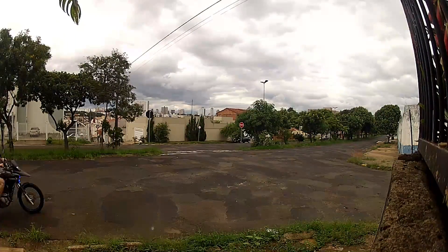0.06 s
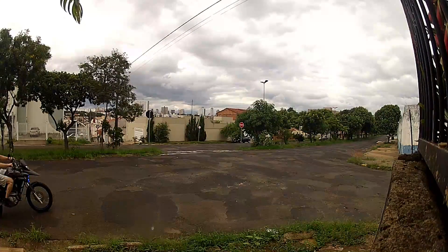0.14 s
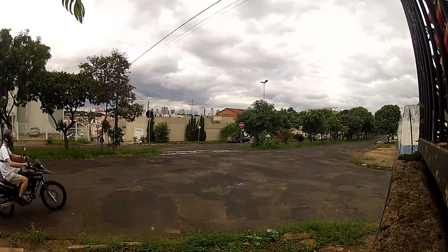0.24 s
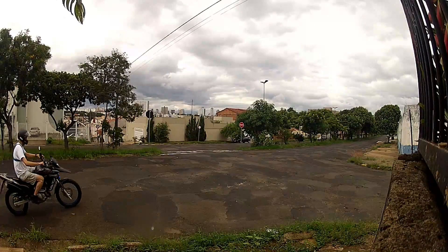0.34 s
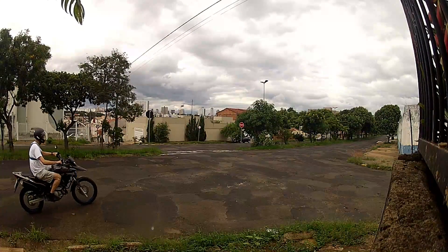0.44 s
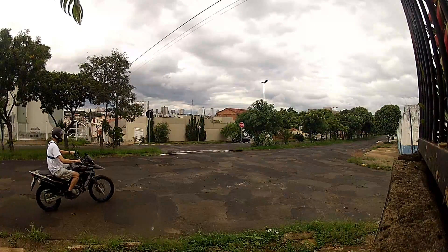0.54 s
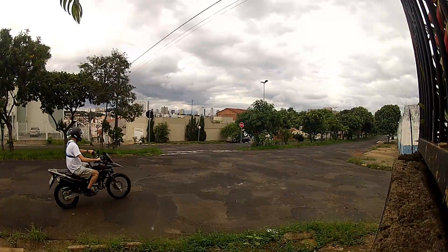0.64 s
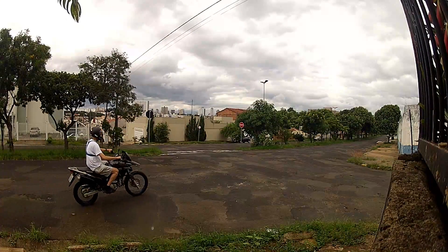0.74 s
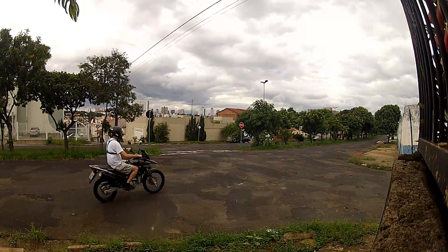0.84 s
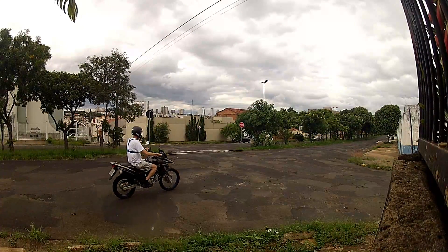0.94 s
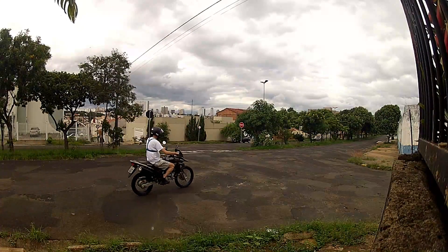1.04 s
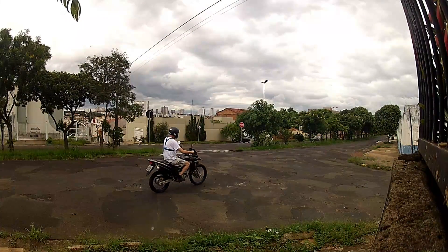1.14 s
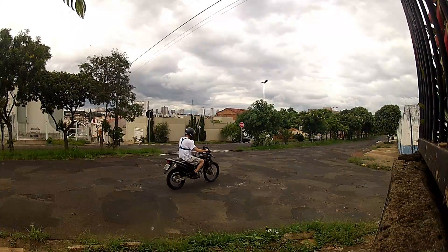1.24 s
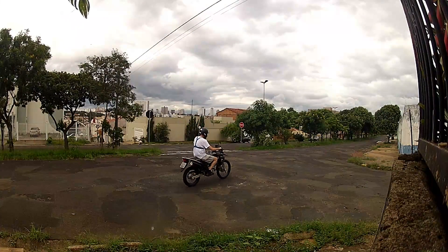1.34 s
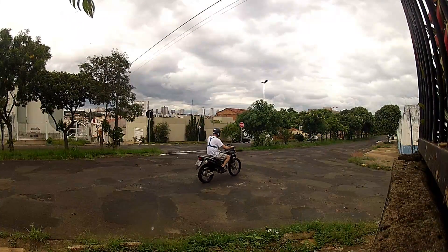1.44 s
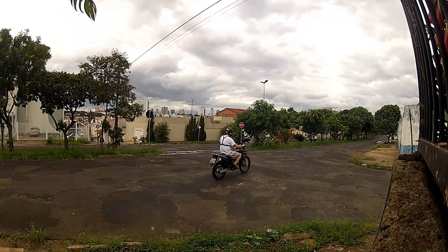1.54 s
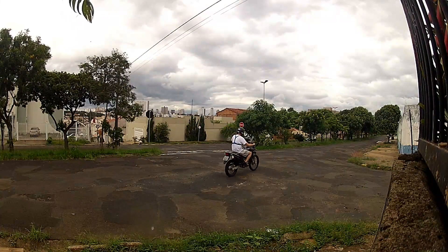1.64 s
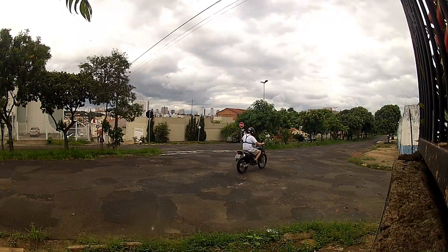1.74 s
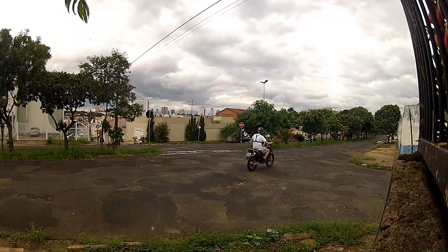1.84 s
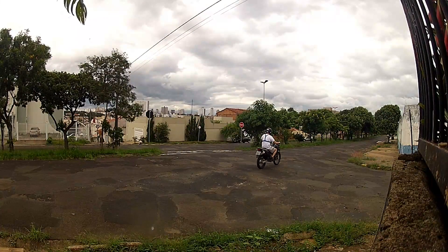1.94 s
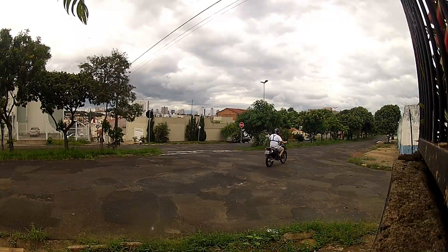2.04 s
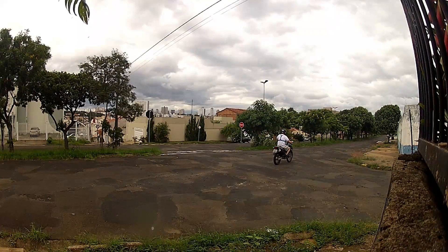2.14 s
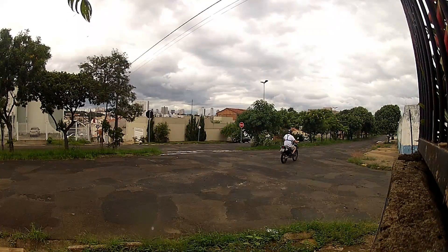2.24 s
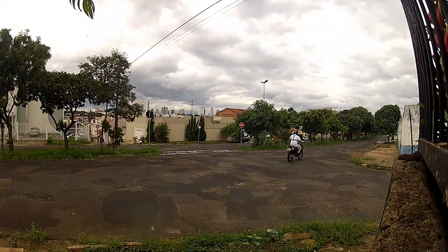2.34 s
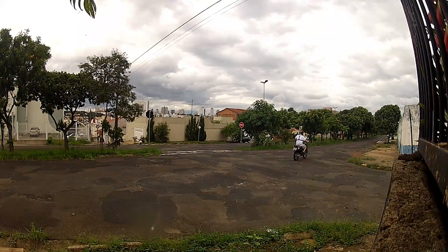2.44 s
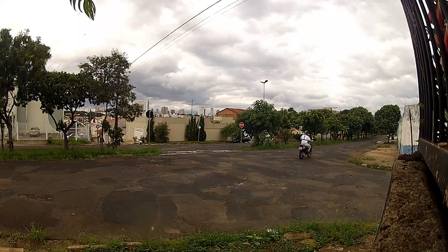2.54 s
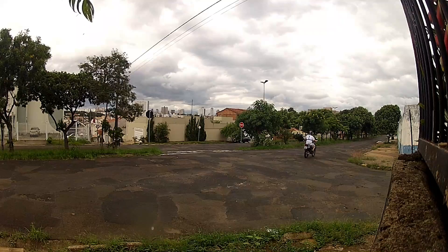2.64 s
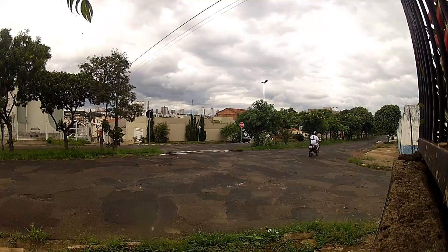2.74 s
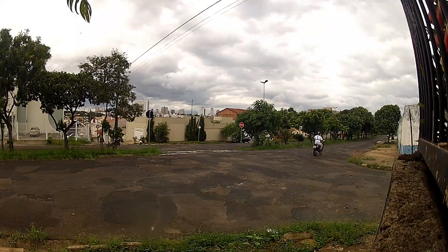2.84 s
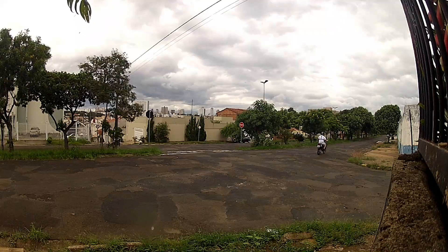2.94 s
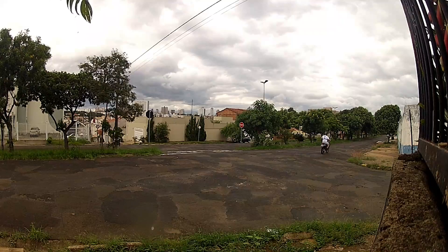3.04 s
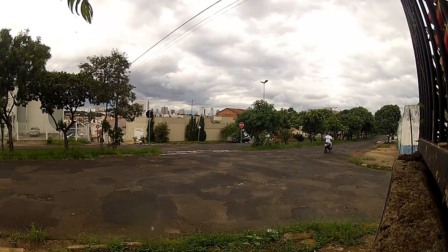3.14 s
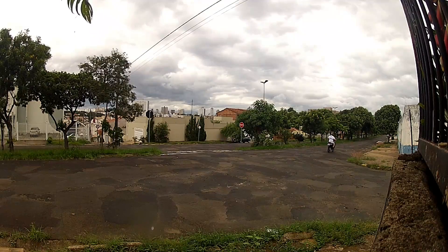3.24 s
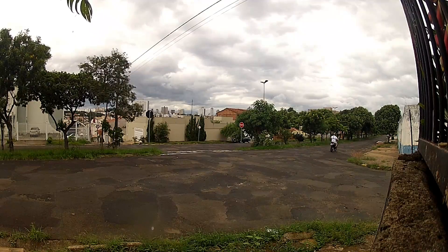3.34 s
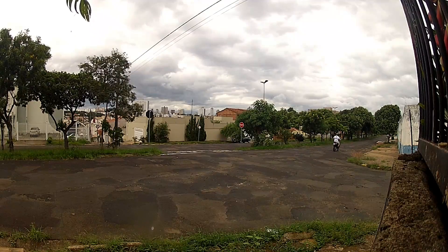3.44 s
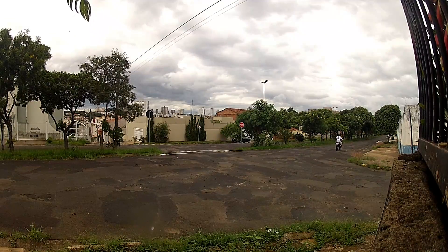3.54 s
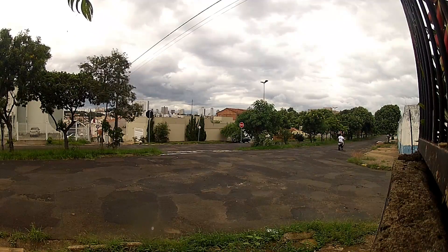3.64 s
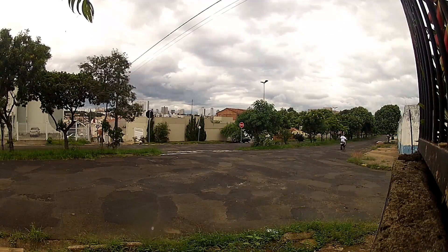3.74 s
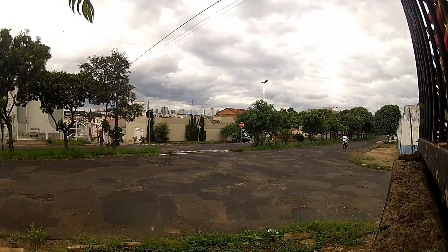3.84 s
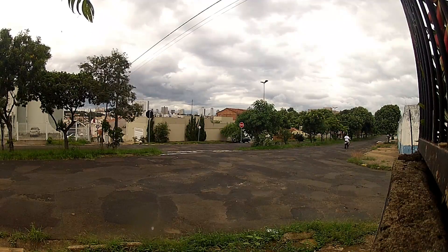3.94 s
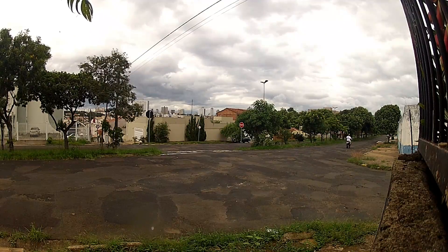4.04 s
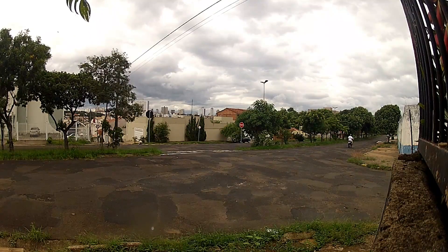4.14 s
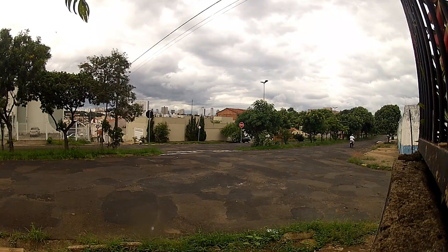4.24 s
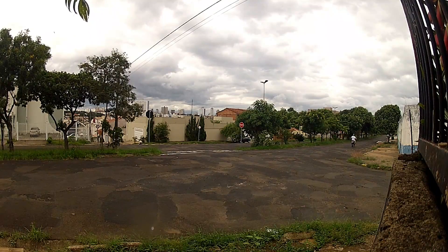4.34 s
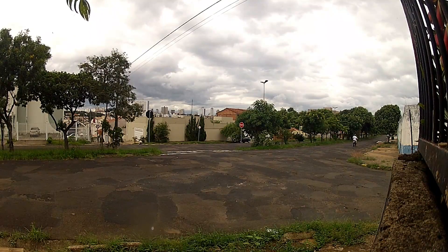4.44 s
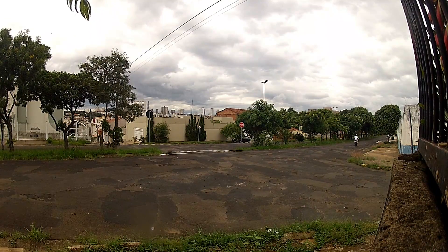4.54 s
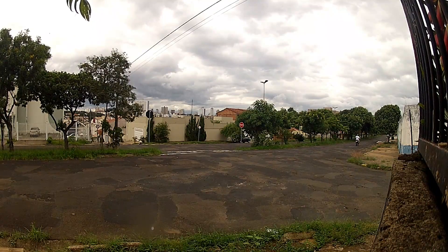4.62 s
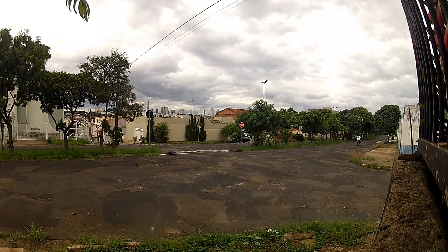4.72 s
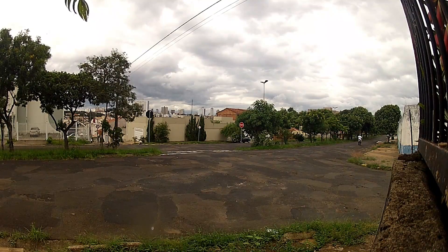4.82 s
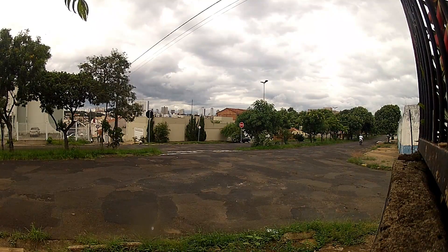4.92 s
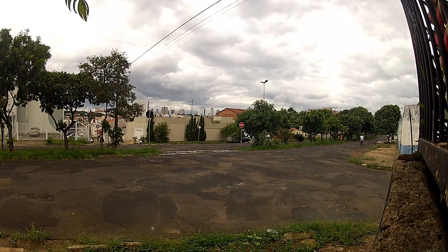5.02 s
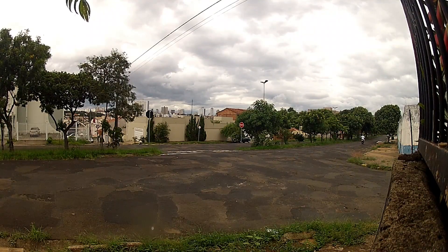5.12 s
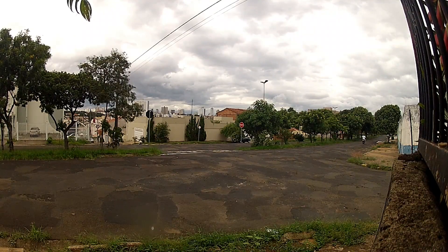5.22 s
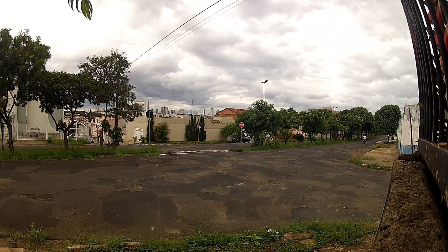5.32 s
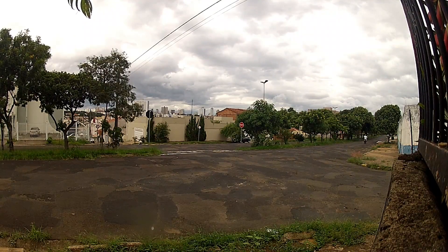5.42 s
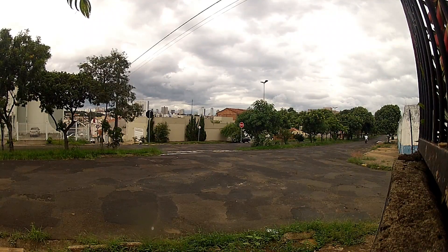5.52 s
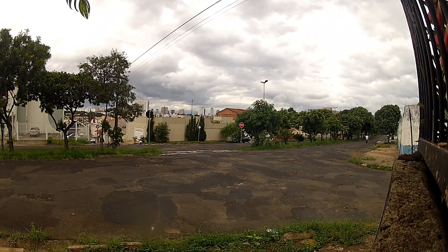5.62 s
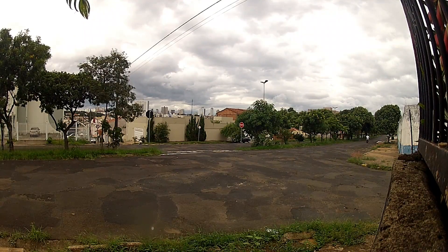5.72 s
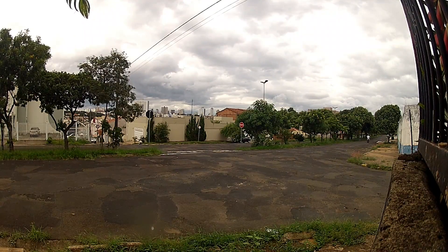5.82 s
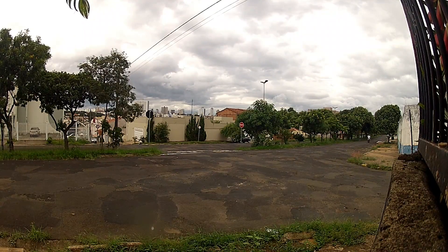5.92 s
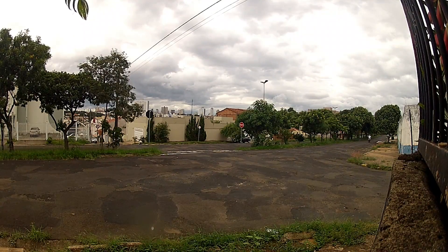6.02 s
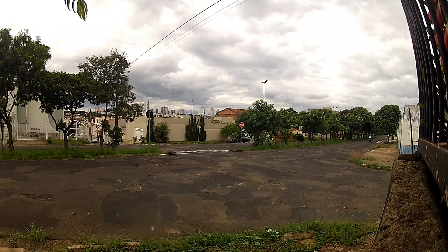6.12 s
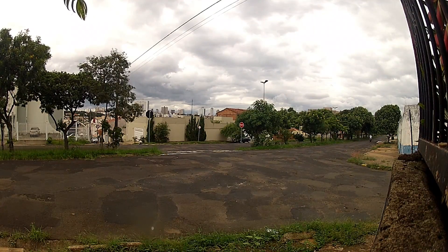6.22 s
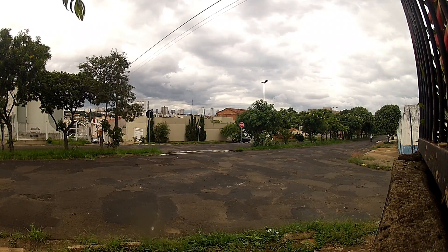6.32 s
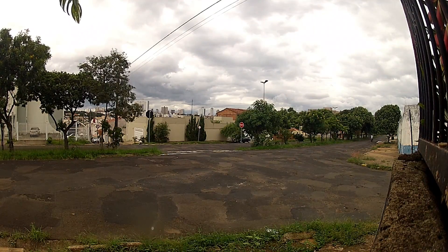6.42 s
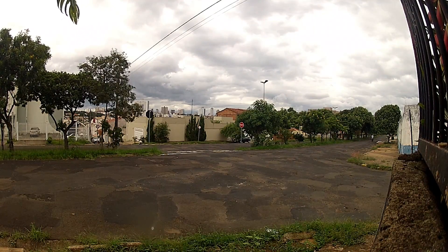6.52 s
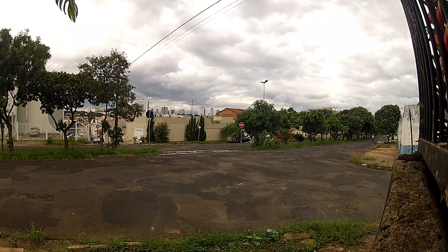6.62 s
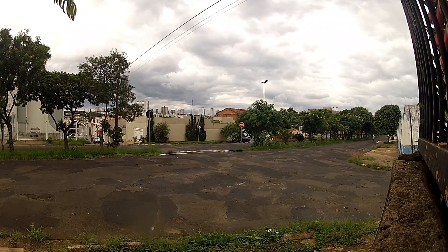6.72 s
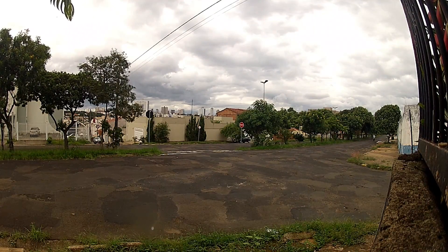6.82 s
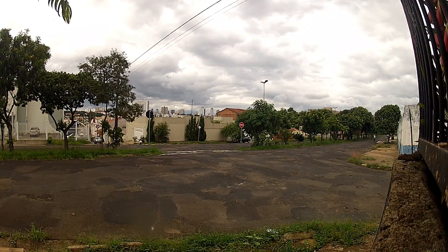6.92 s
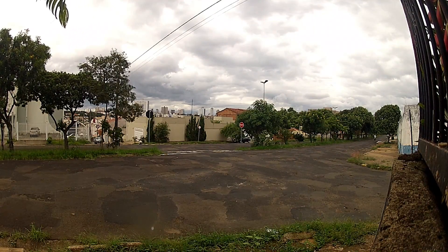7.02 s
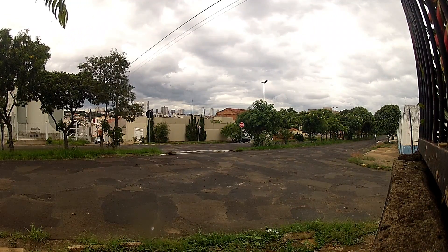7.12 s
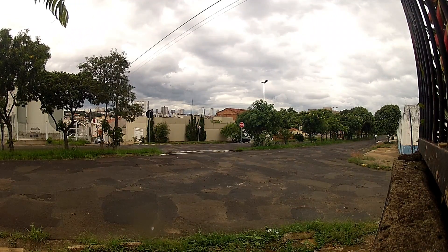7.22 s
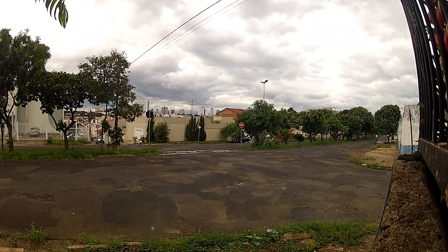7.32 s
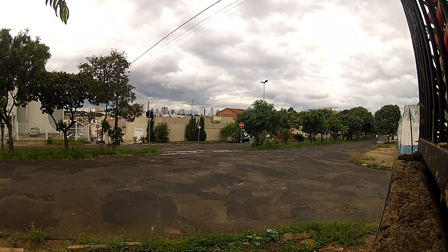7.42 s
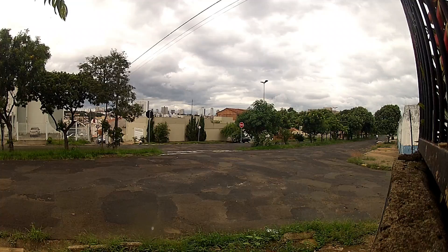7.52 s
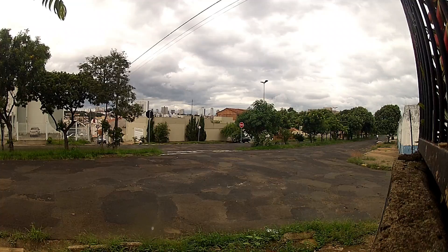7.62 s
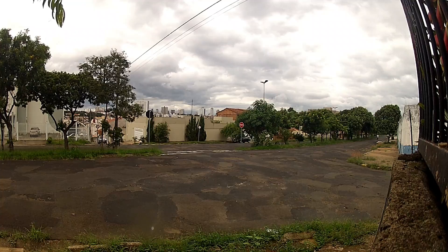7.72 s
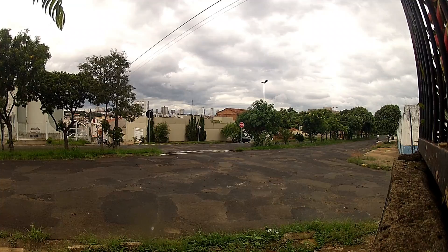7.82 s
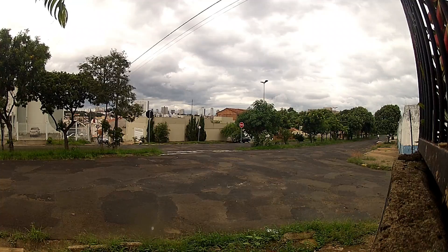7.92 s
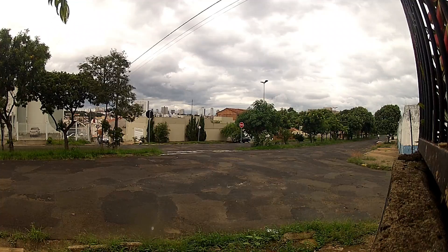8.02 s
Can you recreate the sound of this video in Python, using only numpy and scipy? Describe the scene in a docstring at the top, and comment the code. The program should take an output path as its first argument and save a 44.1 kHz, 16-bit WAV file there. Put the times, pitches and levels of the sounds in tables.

```python
"""Motorcycle passing on a suburban street

A single-cylinder motorcycle passes about 4 m from a camera's microphone and rides off, changing up three times.
Each firing gives a boom in the pipes and a puff of gas; valves and chain rattle in bursts tied to the same cycle.
Sparse echoes off walls and trees take over with distance, with tyre hiss, a click and a squeak over a faint hush.
The camera mirrors the sound around a high tone, which adds a fizzy treble."""
import sys
import numpy as np
from scipy import signal
from scipy.fft import rfft, irfft
from scipy.io import wavfile
from scipy.ndimage import uniform_filter1d

SR = 44100
rng = np.random.default_rng(int(sys.argv[2]) if len(sys.argv) > 2 else 0)


def wav_out(sig):
    """Save sig, one row per channel (or a flat mono array), as 16-bit PCM at SR to the path in sys.argv[1]."""
    wavfile.write(sys.argv[1], SR, np.round(np.clip(np.atleast_2d(sig).T, -1, 1) * 32767).astype(np.int16))


N = 355887
TIME = np.arange(N) / SR
FREQS = np.fft.rfftfreq(N, 1 / SR)

# the ride: nearest the microphone at PASS_S, then away at a growing speed
PASS_S, NEAREST_M, SPEED_M_PER_S, ACCELERATION_M_PER_S2 = 0.65, 4.02, 5.61, 1.78
# side that the bike shows: (time [s], heading [0 alongside, 1 just behind, 2 far behind])
HEADING = [(.9, 0), (1.35, 1), (1.9, 1), (2.7, 1.8), (4, 2)]
# one row per gear: (throttle opens [s], throttle shuts [s], rate at opening [firings/s],
# rate at shutting [firings/s], bulge of the climb [firings/s], bulge of the fall to the next gear [firings/s])
GEARS = [(0, .95, 22.306, 39.134, -.933, .762), (1.32, 3.13, 24.415, 41.68, -1.317, -3.78),
         (3.53, 5.19, 29.252, 37.634, .075, 3.55), (5.86, 8.07, 29.068, 32.026, .918, 0)]
OPEN_S, SHUT_S = .15, .035  # how long the throttle takes to open and to shut
# engine swells and dips down the street: (time [s], level change [dB])
SWELL = [(0, 1), (1.1, -1), (1.6, 1), (2.2, -0.5), (2.95, 1.5), (3.5, -1.5), (4.0, -1), (5.15, 2),
         (5.7, -1), (6.35, 2), (7.1, -1), (8.07, -2.5)]

# boom, the tone at twice the firing rate, under throttle: (time [s], level [dB])
BOOM = [(0, -24.5), (.5, -11.5), (.9, -6.5), (1.35, -16), (1.8, -11), (1.95, -16), (2.39, -12.5),
        (2.51, -8), (2.7, -10), (2.81, -22.5), (3.05, -7.5), (3.55, -23), (3.9, -24), (4.2, -13.5),
        (4.7, -10.5), (5.1, -25.5), (6.05, -28), (8.07, -44)]
# pipe tones, one row per gear, before resonance and distance:
# (3rd [dB], 4th [dB], 5th [dB], 6th [dB], 7th and higher multiples of the firing rate [dB])
GEAR_TONES = [(-26, -20.5, -21.5, -33.5, -34.5), (-19.5, -17.5, -15, -18.5, -24.5),
              (-24.5, -20, -20, -14, -26), (-24, -14, -17, -20.5, -26.5)]
# pipe resonances that the tones slide through under throttle: (frequency [Hz], gain [dB])
PIPE_OPEN = [(66, -17), (80, 2.5), (93, 5.5), (125, 1), (160, 1), (190, -2.5), (220, 3.5), (250, -7),
             (290, -10.5), (390, -1.5), (480, -15)]
# pipe tones with the throttle shut, before swells and distance: (frequency [Hz], level [dB])
PIPE_SHUT = [(60, -24), (75, -15), (90, -8.5), (108, -11), (122, -19.5), (142, -19.5), (160, -26.5),
             (280, -39.5), (450, -53)]

# exhaust colour beside, just behind and far behind the bike: (frequency [Hz], relative level [dB])
RASP_NEAR = [(150, -22), (230, 0), (290, -7), (345, -6), (393, 4.5), (470, -6), (549, 3), (630, -4.5),
             (740, -4), (850, -11.5), (980, -36), (1400, -40), (2200, -23.5)]
RASP_BEHIND = [(160, -11), (238, 8), (285, -4.5), (390, 0), (460, 1.5), (550, -3.5), (660, 0), (780, 1),
               (870, -5), (1000, -16), (1400, -12), (2200, -18.5)]
RASP_FAR = [(150, -16), (250, 0.5), (330, 4.5), (400, 0.5), (460, -0.5), (560, -4), (680, -4.5),
            (780, -3.5), (870, -9.5), (1000, -18.5), (1400, -34), (2200, -29)]
# colour of the valves and chain: (frequency [Hz], relative level [dB])
CLATTER = [(530, -37), (900, -2.5), (974, -1), (1250, -5), (1520, -7.5), (1910, -1), (2260, 5),
           (2650, -0.5), (2910, 0), (3280, -6.5), (3940, -8), (4260, -11.5), (5080, -16.5), (6000, -13),
           (7800, -28), (13200, -120)]
# loudness laws, before swells, roar and echoes: (level nearest at 30 firings/s [dB],
# change with distance [dB/doubling], change with engine speed [dB/doubling], change with throttle shut [dB])
RASP_LAW = (-21, -4, 4, -4.5)
CLATTER_LAW = (-28.5, -6, 6.5, -2)
# intake roar: starts at this rate [firings/s], is full this much higher [firings/s], its boost [dB]
ROAR_FROM, ROAR_SPAN, ROAR_DB = 27, 3, 4

# tyre hiss on damp asphalt: (time [s], level [dB])
TYRES = [(0, -61), (1, -46), (3, -52), (5.1, -55.5), (5.8, -65), (8.07, -68)]
# gearbox click at the second change: (time [s], level [dB], decay [s])
TICKS = [(3.313, -26, 0.012)]
# short squeak: start, length and fundamental, then partials: (multiple of the fundamental, relative level [dB])
SQUEAK_S, SQUEAK_LENGTH_S, SQUEAK_HZ = 7.175, 0.078, 975
SQUEAK = [(2, -50), (3, -49), (4, -51)]
# colour of the street background: (frequency [Hz], relative level [dB])
HUSH = [(15, -22), (35, -5.5), (62, 7), (110, -9.5), (200, -11.5), (330, -16), (500, -25.5), (760, -13.5),
        (1050, -42), (1500, -32), (2200, -38), (4000, -39.5), (6000, -47)]

# camera case rings and swallows: (frequency [Hz], width between 1/e points of the dB curve [Hz], gain [dB])
CASE = [(2000, 38, 4), (2246, 200, -2.5), (2450, 57, -1), (2607, 266, -5.5), (3016, 27, 4.5),
        (3890, 290, 2.5), (5870, 930, -8.5)]
MIRROR_HZ, EDGE_HZ = 12000, 15350  # tone that the treble is mirrored around, and the band limit


def motorcycle(boom_echo_db=-23, whine_db=-16, side_db=4, wet_near=0.18, wet_per_doubling=0.096,
               rough_near=0.078, rough_growth=.8, rasp_swell=0.13):
    """Engine speed times every layer; with distance the rasp blurs and echoes replace direct sound."""
    rate, load, far = engine_speed(), throttle(), remoteness()
    heading, swell_db = curves(HEADING)[0], curves(SWELL)[0]
    turns = np.cumsum(rate) / SR + .3  # firing cycles gone by
    alongside = np.clip(1 - heading, 0, 1)
    wet = np.clip(wet_near + wet_per_doubling * far, 0, 1)
    rough = np.clip(rough_near * 2 ** (rough_growth * far), 0, 1)

    low = pipe_tones(turns, rate, load, heading, far)

    # meshing gear teeth whine faintly as the bike goes by
    teeth = alongside * np.sin(2 * np.pi * 50 * turns + wander(40))
    machinery = clatter(turns, heading) + gain_of(whine_db) * teeth
    machinery = gain_of(side_db * alongside + swell_db) * machinery

    # the intake opens into a roar at high engine speed, heard from the side
    opening = np.clip((rate - ROAR_FROM) / ROAR_SPAN, 0, 1)
    roar = gain_of(ROAR_DB * alongside * load * opening + rasp_swell * swell_db)
    exhaust = roar * rasp(turns, heading, rough)

    high = loudness(RASP_LAW, far, rate, load) * exhaust
    high = high + loudness(CLATTER_LAW, far, rate, load) * machinery
    low_with_echo = low + gain_of(boom_echo_db) * street(low)
    return low_with_echo + np.sqrt(1 - wet ** 2) * high + wet * street(high)


def engine_speed():
    """Firings per second: a bowed climb in each gear, then a bowed fall to the start of the next."""
    knots = []
    for opens, shuts, low, high, _, _ in GEARS:
        knots += [(opens, low), (shuts, high)]
    bulges = [bulge for gear in GEARS for bulge in gear[4:]]
    rate = curves(knots)[0]
    for (start, _), (end, _), bulge in zip(knots, knots[1:], bulges):
        u = np.clip((TIME - start) / (end - start), 0, 1)
        rate = rate + bulge * 4 * u * (1 - u)
    return rate


def throttle():
    """1 while the engine pulls, 0 in each gear change; it dies away in SHUT_S and returns in OPEN_S."""
    load = np.ones(N)
    for old, new in zip(GEARS, GEARS[1:]):
        shuts, opens = old[1], new[0]
        corners = [shuts, shuts + SHUT_S, opens - OPEN_S / 2, opens + OPEN_S / 2]
        load -= np.interp(TIME, corners, [0, 1, 1, 0])
    return load


def remoteness():
    """How many times the distance has doubled from its nearest, on a straight accelerating path."""
    t = TIME - PASS_S
    along_m = SPEED_M_PER_S * t + ACCELERATION_M_PER_S2 * t ** 2 / 2
    return np.log2(np.hypot(NEAREST_M, along_m) / NEAREST_M)


def loudness(law, far, rate, load):
    """A layer's gain from distance, engine speed and throttle."""
    level_db, far_db, rev_db, shut_db = law
    return gain_of(level_db + far_db * far + rev_db * np.log2(rate / 30) + shut_db * (1 - load))


def pipe_tones(turns, rate, load, heading, far, far_db=-5.0, fading_db=0.54, drift=0.13, waver=0.058,
               waver_hz=12, sub_db=-20, burble_db=2.5, flutter_db=0.4, smear=0.2515):
    """Low multiples of the firing rate: boom under throttle, burble between gears, fading in and out afar."""
    boom_db, swell_db = curves(BOOM)[0], curves(SWELL)[0]
    tones_db = curves([(s, *tones) for gear, tones in zip(GEARS, GEAR_TONES) for s in gear[:2]])
    # low tones peak together at each blow, but from the side the boom is nearly inverted,
    # and so is the third tone below its resonance; leads are in radians
    leads = {2: 2.8 * np.clip(1 - heading, 0, 1), 3: np.interp(3 * rate, [78, 100], [2.8, 0])}
    out = gain_of(boom_db + sub_db) * np.cos(2 * np.pi * turns)  # tone at the firing rate itself
    for k in range(2, 13):
        spread_db = swell_db + far * (far_db + fading_db * wander(6))
        if k == 2:
            pulling_db = boom_db
        else:
            pulling_db = tones_db[min(k, 7) - 3] + read(PIPE_OPEN, k * rate) + spread_db
        coasting_db = read(PIPE_SHUT, k * rate) + spread_db + burble_db * wander(22)
        level = load * gain_of(pulling_db) + (1 - load) * gain_of(coasting_db)
        level = level * (1 + waver * (k - 1) * wander(waver_hz))
        # higher tones are smeared in time
        phase = 2 * np.pi * k * (turns - .05) + leads.get(k, 0) - smear * max(k - 4, 0) ** 2
        out = out + level * np.cos(phase + drift * far * wander(2))
    return np.sqrt(2) * gain_of(flutter_db * wander(16)) * out


def rasp(turns, heading, rough, steady=0.082, steady_far=0.32, intake=0.81):
    """A puff of gas at each firing and a gulp of air at the intake stroke, strongest alongside."""
    # every puff is nearly the same as the last: its harmonics only drift
    drone = np.zeros(N)
    for k in range(6, 48):
        drone += np.cos(2 * np.pi * k * turns + rng.uniform(0, 2 * np.pi) + wander(2))
    turbulence = np.sqrt(SR / 3000) * rng.standard_normal(N)  # white, rms 1 per 1500 Hz of band
    gas = np.sqrt(1 - rough) * evened(drone) + np.sqrt(rough) * turbulence

    between = np.interp(heading, [1, 2], [steady, steady_far])  # distance fills the gaps between puffs
    blow = burst(turns, -.02, .088)
    gulp = intake * np.clip(1 - heading, .25, 1) * burst(turns, 0.595, 0.16)
    drive = (between + blow + gulp) * gas * per_firing(turns, spread_db=1.15)

    out = np.zeros(N)
    for k, points in enumerate((RASP_NEAR, RASP_BEHIND, RASP_FAR)):
        share = np.clip(1 - abs(heading - k), 0, 1)
        out += share * evened(colour(drive, points))
    # even strength, so that the loudness law sets the level
    return out / np.sqrt(uniform_filter1d(out ** 2, size=SR // 8) + 1e-12)


def clatter(turns, heading, steady_side=0.32, steady=0.59, steady_far=0.58, second=0.57, grain_db=0.4):
    """Valves and chain rattle in two gritty bursts a cycle: crisp from the side, blurred from behind."""
    alongside = np.clip(1 - heading, 0, 1)
    from_side = 1.3 * burst(turns, .5, .07) + .7 * burst(turns, .02, .07)
    from_behind = burst(turns, 0.052, 0.1) + second * burst(turns, 0.86, 0.12)
    between = np.interp(heading, [0, 1, 2], [steady_side, steady, steady_far])
    gate = between + alongside * from_side + (1 - alongside) * from_behind
    grit = rng.standard_normal(N) * gain_of(grain_db * wander(410))
    return evened(colour(gate * grit * per_firing(turns, spread_db=1.0), CLATTER))


def burst(turns, at, length):
    """A gate that opens once a cycle and dies away; at and length are shares of the cycle."""
    age = (turns - at) % 1 / length
    return age * np.exp(-age)


def per_firing(turns, spread_db):
    """A new random strength for every cycle."""
    strengths = gain_of(spread_db * rng.standard_normal(N))
    return strengths[np.floor(turns).astype(int)]


def street(x, t60=0.76, gap_s=.018, count=6):
    """Sparse echoes off walls and trees, a new set for each stretch of road; the treble dies first."""
    out = np.zeros(N)
    for k in range(count):
        signs = rng.choice([-1., 1.], SR)
        taps = signs * (rng.random(SR) < 1500 / SR) * (TIME[:SR] > gap_s)  # about 1500 echoes per s
        hz, t, z = signal.stft(taps, SR, nperseg=256)
        decay = gain_of(-60 * t * (1 + hz[:, None] / 5000) / t60)
        tail = signal.istft(z * decay, SR, nperseg=256)[1]
        # crossfade from one stretch to the next
        here = np.sqrt(np.clip(1 - abs(TIME / TIME[-1] * (count - 1) - k), 0, 1))
        out += signal.oaconvolve(x * here, tail / np.linalg.norm(tail))[:N]
    return out


def tyres():
    """A thin noise hiss of the tyres, strongest just after the bike has passed."""
    hiss = colour(rng.standard_normal(N), [(1500, -17.5), (4000, -8.0), (5000, -2.5), (5800, -7), (7000, -28.5)])
    return gain_of(curves(TYRES)[0]) * evened(hiss)


def ticks():
    """A short dry gearbox click: coloured noise that starts at once and decays exponentially."""
    envelope = np.zeros(N)
    for s, db, decay in TICKS:
        envelope += gain_of(db) * (TIME >= s) * np.exp(-abs(TIME - s) / decay)
    noise = colour(rng.standard_normal(N), [(300, -6), (1500, -2), (3000, -6), (5200, -2.0), (6500, -1)])
    return envelope * evened(noise)


def squeak(level_db=-2):
    """A faint squeak somewhere in the street: harmonics made rough by a fast-wandering pitch."""
    turns = np.cumsum(SQUEAK_HZ * (1 + .028 * wander(250))) / SR
    swell = np.sin(np.pi * np.clip((TIME - SQUEAK_S) / SQUEAK_LENGTH_S, 0, 1))
    tone = sum(gain_of(db) * np.sin(2 * np.pi * k * turns) for k, db in SQUEAK)
    return np.sqrt(2) * gain_of(level_db) * swell * tone


def hush(level_db=-34, swell_db=3.5, air_swell_db=1.8):
    """Noise of the neighbourhood: the low rumble swells, the air above it about half as much in dB."""
    noise = evened(colour(rng.standard_normal(N), HUSH))
    rumble = irfft(rfft(noise) / (1 + (FREQS / 300) ** 4), N)
    air = noise - rumble
    swell = wander(12)
    return gain_of(level_db) * (gain_of(swell_db * swell) * rumble + gain_of(air_swell_db * swell) * air)


def gain_of(db):
    """Decibels to amplitude."""
    return 10 ** (np.asarray(db) / 20)


def evened(x):
    """Scales to rms 1."""
    return x / np.sqrt(np.mean(x ** 2) + 1e-20)


def curves(rows):
    """Every column of a timed table, at each sample."""
    s, *columns = np.transpose(rows)
    return [np.interp(TIME, s, c) for c in columns]


def read(points, hz):
    """A spectrum joined by straight lines on a log-frequency axis."""
    f, value = np.transpose(points)
    return np.interp(np.log(hz + 1), np.log(f + 1), value)


def colour(x, points, size=8192):
    """Causal minimum-phase filter with the given spectrum: it rings after a pulse, never before."""
    log_gain = np.log(gain_of(read(points, abs(np.fft.fftfreq(size, 1 / SR)))))
    response = np.exp(np.conj(signal.hilbert(log_gain)))
    taps = np.fft.ifft(response).real[:size // 2]
    return signal.oaconvolve(x, taps)[:N]


def wander(hz):
    """Smooth random drift of rms 1, roughly no faster than hz."""
    steps = rng.standard_normal(int(TIME[-1] * 8 * hz) + 16)
    smooth = evened(np.convolve(steps, np.hanning(9), "valid"))
    return np.interp(TIME, np.linspace(0, TIME[-1], len(smooth)), smooth)


def scene():
    """The bike, its tyres and click, a squeak and the street, as one channel."""
    return (motorcycle() + tyres() + ticks() + squeak() + hush())[None]


def record(dry, mirror_db=-3.0, mirror_low_hz=230):
    """Camera: case resonances, the sound's slope mirrored around a high tone, overload and band limit."""
    case_db = sum(db * np.exp(-(2 * (FREQS - hz) / width) ** 2) for hz, width, db in CASE)
    # steep low-pass at half the mirror tone
    body = rfft(dry[0]) * gain_of(case_db) / np.sqrt(1 + (2 * FREQS / MIRROR_HZ) ** 40)
    low_cut = FREQS ** 2 / (FREQS ** 2 + mirror_low_hz ** 2)
    slope = irfft(body * 2j * FREQS / MIRROR_HZ * low_cut, N)
    image = 2 * slope * np.cos(2 * np.pi * MIRROR_HZ * TIME)
    image = colour(image, [(6000, 4), (8500, 7.5), (10000, 4.5), (12000, 4), (15000, -1)])
    loud = np.clip(irfft(body, N) + gain_of(mirror_db) * image, -1, 1)
    band_limit = signal.firwin(601, EDGE_HZ, window=("kaiser", 8), fs=SR)
    return signal.oaconvolve(loud, band_limit, "same")[None]


dry = scene()
out = record(dry)
wav_out(out)
```